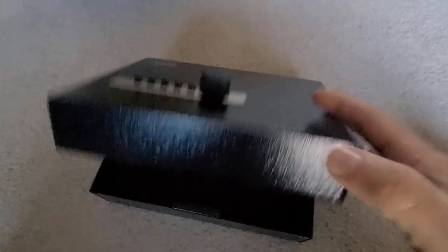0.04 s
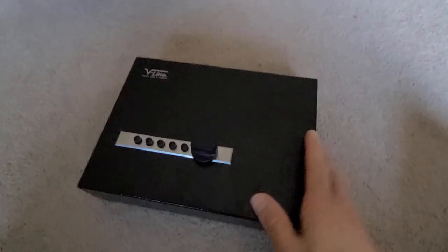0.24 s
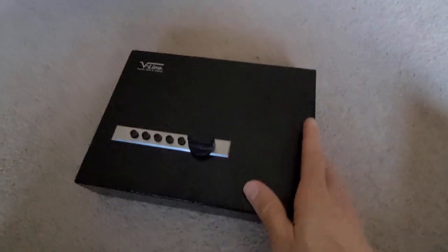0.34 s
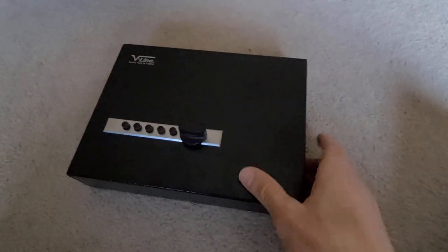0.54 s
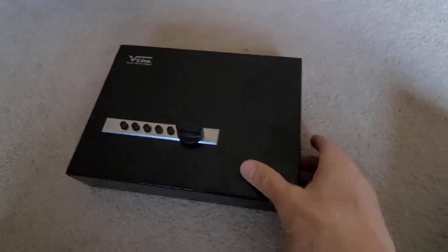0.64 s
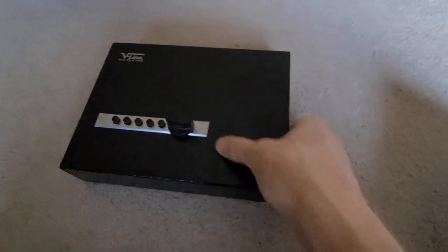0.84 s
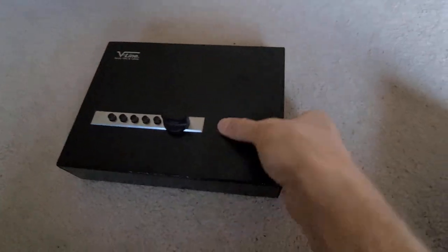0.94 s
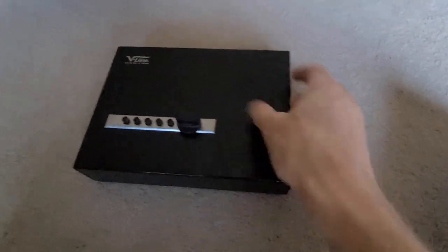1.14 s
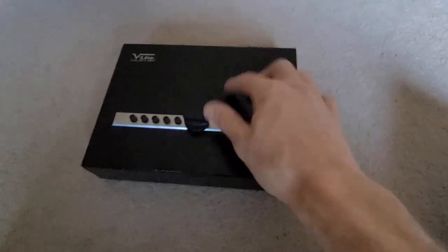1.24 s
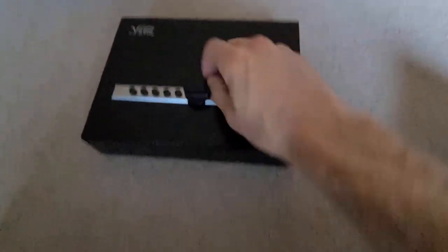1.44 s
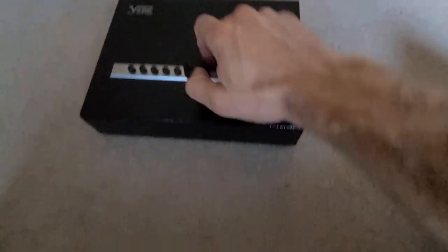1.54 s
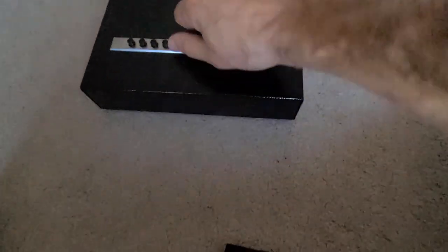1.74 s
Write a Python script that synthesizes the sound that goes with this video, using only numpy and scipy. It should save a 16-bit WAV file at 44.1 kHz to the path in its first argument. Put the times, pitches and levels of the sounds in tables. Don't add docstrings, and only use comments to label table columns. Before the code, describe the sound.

Steel case lid closing with a low thud and clatter, followed by soft handling and latch clicks

```python
import sys
import numpy as np
from scipy import signal
from scipy.fft import rfft, irfft, next_fast_len
from scipy.io import wavfile
from scipy.ndimage import uniform_filter1d, map_coordinates

SR = 44100
rng = np.random.default_rng(int(sys.argv[2]) if len(sys.argv) > 2 else 0)


def unload_audio(sound):
    columns = np.transpose(np.atleast_2d(sound))
    steps = np.round(np.clip(columns, -1, 1) * 32767)
    wavfile.write(sys.argv[1], SR, steps.astype(np.int16))


def voltage_ratio(decibels):
    exponent = np.asarray(decibels, float) / 20
    return 10 ** exponent


N = 79380

# (frequency [Hz], width [Hz], level [dB])
STEEL_MODES = [(1000, 430, -14.5), (1854, 80, 3.5), (2260, 99, -2.5), (3290, 50, 2), (3800, 150, -10.5),
               (5100, 170, 0.5), (6400, 86, -9.5), (7080, 130, 4.5), (11990, 140, -3.5)]
# (frequency [Hz], correlation [-1..1])
CONTACT_ALIKE = [(60, 1), (240, 0.97), (950, 1), (3770, 0.16), (15000, 0.075)]
# (frequency [Hz], correlation [-1..1])
PANEL_ALIKE = [(200, 1), (1000, 0.83)]
# (frequency [Hz], correlation [-1..1])
QUIET_ALIKE = [(60, 0.99), (240, 0.92), (950, -0.27), (3770, -0.27), (15000, -0.01)]


def unit(x):
    return x / np.sqrt(np.mean(x ** 2) + 1e-20)


def along(points, hz):
    f, v = np.transpose(points)
    return np.interp(np.log(hz + 1), np.log(f + 1), v)


def curve(points):
    s, v = np.transpose(points)
    return np.interp(np.arange(N) / SR, s, v)


def wobble(rate_hz):
    knots = rng.standard_normal(int(N * rate_hz / SR) + 4)
    return map_coordinates(knots, [np.arange(N) * rate_hz / SR])


def filtered(x, response):
    m = next_fast_len(x.shape[-1] + SR // 4)
    spectrum = rfft(x, m) * response(np.fft.rfftfreq(m, 1 / SR))
    return irfft(spectrum, m)[..., :x.shape[-1]]


def peaks(modes, f):
    total = 0
    for k, (centre, width, db) in enumerate(modes):
        resonance = 1j * f * width / (centre * centre - f * f + 1j * f * width)
        total = total + (-1) ** k * voltage_ratio(db) * resonance
    return total


def pair(n, alike):
    def mix(hz):
        angle = np.arccos(np.clip(along(alike, hz), -1, 1)) / 2
        return np.array([np.cos(angle), np.sin(angle)])

    mid, side = filtered(rng.standard_normal((2, n)), mix)
    return np.array([mid + side, mid - side])


def lean(hz):
    # (frequency [Hz], level [dB])
    left_over_right = [(60, 20), (240, -4.5), (950, 1.5), (3770, 6.5), (15000, 11)]
    left_lag_s = .0001
    half = np.array([[.5], [-.5]])
    return voltage_ratio(along(left_over_right, hz) * half) * np.exp(-2j * np.pi * hz * left_lag_s * half)


def bass_arrival(x):
    left_lag_s = 0.000086
    half = np.array([[.5], [-.5]])
    return filtered(x, lambda hz: np.exp(-2j * np.pi * hz * left_lag_s * half))


def ventilation():
    # (frequency [Hz], density [dB per Hz])
    turbulence = [(12, -43), (20, 1.5), (53, -7.5), (69, 3.5), (125, -10.5), (211, -20.5), (555, -32.5),
                  (653, -15.5), (1000, -30), (1300, -46), (2200, -120)]
    # (frequency [Hz], width [Hz], level [dB])
    duct_modes = [(61, 21, -28), (78.1, 9.5, 8), (170, 75, -0.5), (786, 390, -7.5)]
    noise = pair(N, QUIET_ALIKE)
    rumble = filtered(noise, lambda hz: voltage_ratio(along(turbulence, hz)) * (1 + peaks(duct_modes, hz)))
    return voltage_ratio(-49.5 - 2.5) * unit(rumble)


def microphone_hiss():
    # (frequency [Hz], density [dB per Hz])
    spectrum = [(530, -26), (900, -28), (1050, -1), (1740, -4.5), (2270, -9), (6610, -8), (8110, -5),
                (9150, -27), (15900, -13)]
    hiss = unit(filtered(pair(N, QUIET_ALIKE), lambda hz: voltage_ratio(along(spectrum, hz))))
    return voltage_ratio(-69 + 2.6 * wobble(5.3)) * hiss


def mains_hum():
    # (frequency [Hz], level [dB])
    lines = [(120, -50), (360, -73)]
    t = np.arange(N) / SR
    return sum(voltage_ratio(db - 4.5 + 3.0 * wobble(2.38)) * np.sin(2 * np.pi * hz * t) for hz, db in lines)


def room(x):
    # (frequency [Hz], decay by 60 dB [s])
    decay = [(300, 0.13), (2000, 0.19), (10000, 0.072)]
    hz, t, z = signal.stft(rng.standard_normal((2, SR // 2)), SR, nperseg=256)
    tail = signal.istft(z * voltage_ratio(-60 * t / along(decay, hz)[:, None]), SR, nperseg=256)[1]
    delayed = np.pad(x, ((0, 0), (200, 0)))
    return signal.fftconvolve(delayed, tail / np.linalg.norm(tail[0]), axes=1)[:, :N]


def panel_murmur():
    # (time [s], level [dB])
    load = [(0, -97), (.095, -60), (.104, -45), (.29, -46), (.44, -54.5), (.5, -80), (1.07, -95),
            (1.11, -42.5), (1.17, -42), (1.22, -47), (1.27, -53), (1.48, -50), (1.63, -57), (1.8, -66)]
    # (frequency [Hz], density [dB per Hz])
    force = [(120, -3.5), (200, 1), (450, -12), (1000, -21.5), (2000, -52.5)]
    # (frequency [Hz], width [Hz], level [dB])
    panel_modes = [(393.7, 28.5, 1), (564.5, 14.5, 12.5), (678, 12.7, 13), (933, 13, 8.5)]
    lumpy = voltage_ratio(2.5 * wobble(45.49)) * pair(N, PANEL_ALIKE)
    murmur = filtered(lumpy, lambda hz: voltage_ratio(along(force, hz)) * (1 + peaks(panel_modes, hz)))
    return voltage_ratio(curve(load)) * unit(murmur)


def friction():
    # (time [s], level [dB])
    rubbing = [(0, -54), (.09, -55.5), (.11, -37.5), (.3, -39), (.41, -60.5), (.75, -70), (1.05, -60),
               (1.15, -40.5), (1.29, -66), (1.34, -54.5), (1.7, -55), (1.8, -69.5)]
    # (frequency [Hz], density [dB per Hz])
    skin = [(530, -0.5), (900, -16.5), (1510, -7.5), (2190, -11), (3810, -11.5), (6080, -9.5),
            (9260, -26.5), (12400, -22), (15900, -22.5)]
    grain = voltage_ratio(1 * wobble(330) + 0.45 * wobble(60.1))

    def colour(hz):
        return voltage_ratio(along(skin, hz)) * lean(hz) * (1 + 2.28 * peaks(STEEL_MODES, hz))

    return voltage_ratio(curve(rubbing) - 5.0) * unit(filtered(grain * pair(N, CONTACT_ALIKE), colour))


def bolt_slide():
    # (frequency [Hz], width [Hz], level [dB])
    guide_modes = [(715, 14, 0), (664, 14, -4), (960, 70, -16)]
    start_s, stop_s, fade_s = 1.23, 1.49, 0.0052
    t = np.arange(N) / SR
    moving = np.clip(np.minimum(t - start_s, stop_s - t) / fade_s, 0, 1)
    song = unit(filtered(pair(N, PANEL_ALIKE), lambda hz: peaks(guide_modes, hz)))
    return voltage_ratio(-55 + 0.72 * wobble(27.4)) * moving * song


def panel_knocks():
    # (time [s], level [dB], frequency [Hz], decay by 60
    # dB [s])
    pushes = [(0.106, -35, 191, 0.25), (.103, -35.5, 365.4, 0.31), (.104, -41, 561, 0.21),
              (0.161, -29, 272.4, 0.082), (0.1989, -10.5, 184, 0.019), (0.228, -29.5, 76, 0.27),
              (0.243, -15.5, 154, 0.023), (0.267, -24.5, 182, 0.049), (.31, -46.5, 913, 0.18),
              (0.299, -24, 26.7, 0.18), (0.348, -39.5, 199.4, 0.18), (0.399, -32, 27.6, 0.23),
              (1.197, -36, 28.8, 0.4), (1.229, -38.5, 79.6, 0.36), (1.313, -38, 151, 0.08),
              (1.36, -34.5, 178, 0.29), (1.41, -38, 84, 0.28), (1.468, -35.5, 157, 0.27),
              (1.521, -42, 82.6, 1), (1.602, -36, 84.5, 0.61), (1.7, -43.5, 88.6, 0.88)]
    # (time [s], level [dB], frequency [Hz], decay by 60 dB [s])
    sheet_rings = [(.104, -41.5, 468, 0.16), (.2855, -40, 970, 0.068), (.286, -35, 1780, 0.048),
                   (.2425, -40, 2377, .06), (.294, -52, 776, 0.068), (1.128, -39, 532, 0.087),
                   (1.132, -41, 2194, 0.14), (1.127, -41.5, 898, 0.084), (1.27, -41.5, 535, 0.057),
                   (1.572, -50.5, 1950, 0.026), (1.325, -53, 961, 0.16), (0.288, -40, 1880, 0.063),
                   (.29, -46, 719, .15), (.33, -46.5, 899, 0.26), (1.099, -45, 2130, 0.093),
                   (1.107, -53, 2230, 0.13), (1.103, -40.5, 515, 0.21), (1.11, -46.5, 726, 0.36),
                   (1.14, -46, 1705, 0.073), (1.242, -50, 913, 0.083), (1.335, -47, 285.2, 0.56),
                   (1.379, -47.5, 1920, 0.059), (1.49, -35, 1896, .04), (1.497, -32, 1868, 0.045),
                   (1.497, -43, 425, 0.087), (1.51, -48, 329, 0.31), (1.572, -49, 1010, 0.042),
                   (1.693, -48, 6220, .05)]
    out = np.zeros(N + SR)
    t = np.arange(SR // 2) / SR
    for s, db, hz, t60 in pushes + sheet_rings:
        swell = 1 - np.exp(-t * hz / 0.26)
        out[round(s * SR):][:len(t)] += voltage_ratio(db - 60 * t / t60) * np.sin(2 * np.pi * hz * t) * swell
    return out[:N]


def contacts(rows, rise):
    # (frequency [Hz], density [dB per Hz])
    clatter = [(260, 0.5), (480, -5), (820, -0.5), (2360, -3), (4400, -8.5), (6600, -11.5), (9300, -27.5),
               (12000, -19), (15900, -23)]
    steel_db = 6
    favour_db, favour_width = 12, .14
    lead = 64
    out = np.zeros((2, N + SR))
    t = np.arange(SR // 5) / SR
    for s, db, tilt_db, length, near_hz in rows:
        spikes = voltage_ratio(2.6 * unit(uniform_filter1d(rng.standard_normal(len(t)), size=30)))
        u = t / np.clip(length, .001, .05)
        burst = pair(len(t), CONTACT_ALIKE) * spikes * u ** rise * np.exp(-2.5 * u)

        def colour(hz):
            nearest = peaks([(near_hz, favour_width * near_hz, favour_db)], hz)
            modes = 1 + voltage_ratio(steel_db) * peaks(STEEL_MODES, hz) + nearest
            broad_db = along(clatter, hz) + tilt_db * np.log2((hz + 300) / 3000)
            return voltage_ratio(broad_db) * lean(hz) * modes

        hit = filtered(np.pad(burst, ((0, 0), (lead, 0))), colour)
        peak = np.sqrt(np.max(uniform_filter1d(hit.mean(0) ** 2, size=90)))
        out[:, round(s * SR) - lead:][:, :hit.shape[1]] += voltage_ratio(db - 6.5) * hit / peak
    return out[:, :N]


def latch_contacts():
    # (time [s], peak level [dB], brightness [dB per octave], length [s], nearest mode [Hz])
    rattles = [(.63, -66.5, 0.5, .04, 13000), (.895, -62.5, 2, 0.04, 12900), (1.075, -45.5, 2, 0.067, 1960),
               (1.098, -40, -4.5, 0.01, 2150), (1.1055, -30.5, -1.5, 0.014, 2170),
               (1.095, -36.5, 12, 0.038, 5560), (1.128, -22.5, 12.5, 0.0062, 7140),
               (1.136, -37.5, 7, 0.016, 1700), (1.19, -43, -1.5, 0.0066, 11900),
               (1.2405, -45, -1, 0.011, 6400), (1.243, -46.5, -4, 0.016, 2270), (1.32, -44, -1, 0.031, 910),
               (1.364, -49, -2, 0.016, 2010), (1.376, -40, -1, 0.0063, 2570),
               (1.385, -45, -7.5, 0.013, 2030), (1.475, -44.5, 5, 0.022, 2430),
               (1.4875, -34.5, 1.5, 0.0054, 1800), (1.4955, -33, -4, 0.0098, 13800),
               (1.665, -50, 12, 0.03, 6600), (1.676, -49, 0, 0.005, 6340), (1.679, -44, -8, 0.005, 1880),
               (1.6895, -39.5, 9, 0.007, 6300), (1.688, -74, 11, 0.012, 11500)]
    # (time [s], peak level [dB], brightness [dB per octave], length [s], nearest mode [Hz])
    clicks = [(.1018, -38, 2, .003, 560), (1.1885, -36, 2, .006, 6800), (1.2265, -41, 0, .007, 5500),
              (1.2414, -42, 0, .005, 2300), (1.2695, -38, -3, .007, 1080), (1.27, -41, -1, .007, 6500),
              (1.378, -41, -3, .007, 3100), (1.4966, -29, 0, .006, 1880), (1.502, -31, 0, .008, 2000),
              (1.571, -42, -3, .005, 1900), (1.694, -43, 3, .006, 5900)]
    return contacts(rattles, 1.29) + contacts(clicks, .45)


def air_puffs():
    # (time [s], peak level [dB])
    squeezes = [
        (0.198, -7.5),
        (0.282, -23),
        (1.117, -20),
    ]
    # (frequency [Hz], level [dB], decay by 60 dB [s])
    box_modes = [(69.6, -9.5, 0.091), (125.4, -15.5, 0.2), (155, 14, 0.031)]
    sealed_hz, sag_hz, seal_s = 155, 105, .011
    rise_s, sharpness = .0105, 5
    out = np.zeros(N + SR)
    t = np.arange(SR // 2) / SR
    cycles = sealed_hz * t - sag_hz * seal_s * (1 - np.exp(-t / seal_s))
    swell = (t / rise_s * np.exp(1 - t / rise_s)) ** sharpness
    puff = swell * np.sin(2 * np.pi * cycles)
    ring = sum(voltage_ratio(db - 60 * t / t60) * np.sin(2 * np.pi * hz * t) for hz, db, t60 in box_modes)
    ring = ring * (1 - np.exp(-(t / 0.014) ** 2))
    for s, db in squeezes:
        out[round(s * SR):][:len(t)] += voltage_ratio(db) * (puff + ring)
    return out[:N]


def lid_contacts():
    # (time [s], peak level [dB], brightness [dB per octave], length [s], nearest mode [Hz])
    bounces = [(.101, -31, -13, 0.012, 535), (.1605, -23.5, 0, 0.0039, 5100),
               (.163, -25.5, -2.5, 0.013, 2100), (.18, -34.5, 12, 0.017, 5300),
               (.1995, -26, -0.5, 0.0047, 6140), (.2405, -29, 0.5, 0.0035, 2420),
               (.2485, -35.5, 13, 0.0017, 6400), (.2495, -33.5, 0, 0.013, 2580), (.262, -47, 6, .01, 15200),
               (.266, -36, 2.5, 0.0064, 12300), (.277, -26.5, 1, 0.012, 6900), (.284, -17, 2, 0.0052, 1834),
               (.289, -24.5, 1, 0.0041, 6670), (.294, -18.5, 0, 0.0048, 5100), (.299, -30, 4, 0.0031, 2350),
               (.304, -30, 4, 0.0032, 7200), (.312, -42.5, -4.5, 0.032, 2040), (.341, -38, 3, 0.009, 6900),
               (.37, -39.5, -1.5, 0.016, 6100), (.372, -50, 14, 0.012, 12000)]
    return contacts(bounces, 1.29)


def scene():
    background = ventilation() + microphone_hiss() + mains_hum()
    handling = panel_murmur() + friction() + bolt_slide()
    low = bass_arrival(air_puffs() + panel_knocks())
    latch = latch_contacts()
    lid = lid_contacts()
    reverberation = voltage_ratio(-10.5) * (room(lid) + room(latch))
    return background + handling + low + latch + lid + reverberation


def band_limit(x):
    return signal.sosfilt(signal.butter(12, 16160, fs=SR, output="sos"), x)


def record(dry):
    mix = filtered(dry, lambda hz: hz < 15900)
    return band_limit(mix)


dry = scene()
out = record(dry)
unload_audio(out)
```